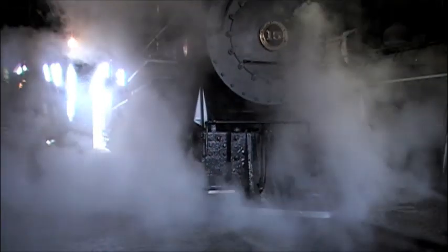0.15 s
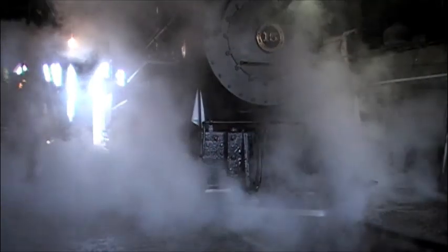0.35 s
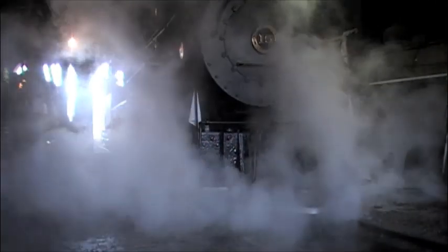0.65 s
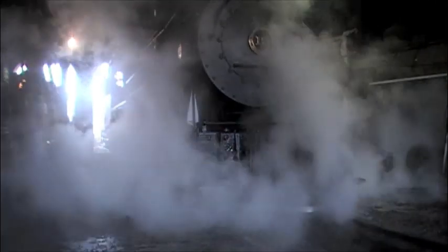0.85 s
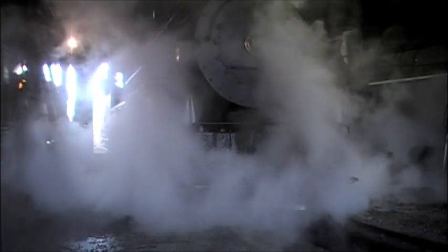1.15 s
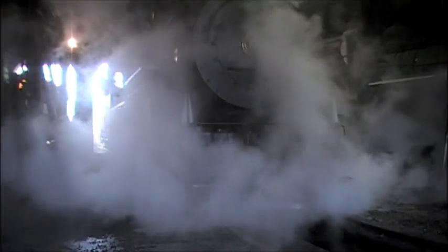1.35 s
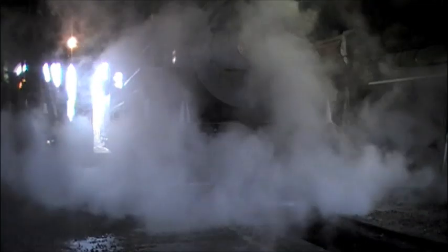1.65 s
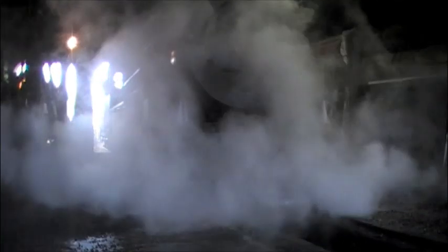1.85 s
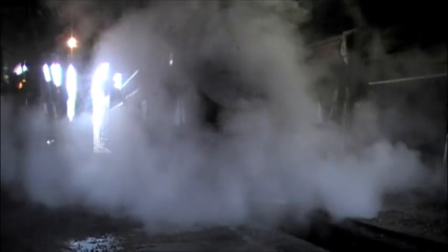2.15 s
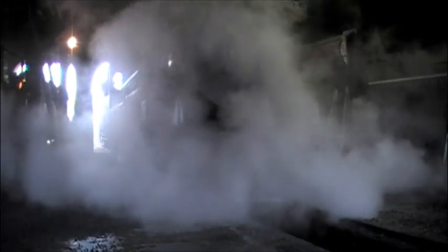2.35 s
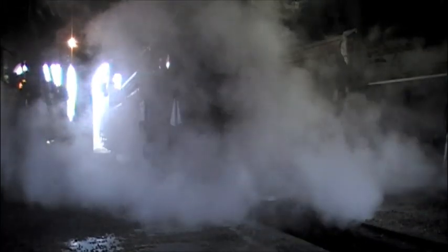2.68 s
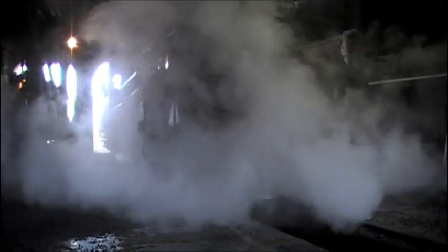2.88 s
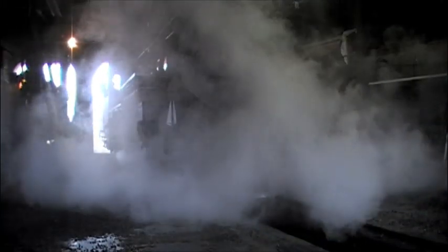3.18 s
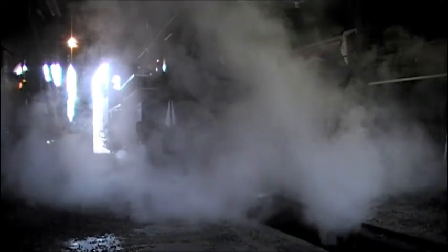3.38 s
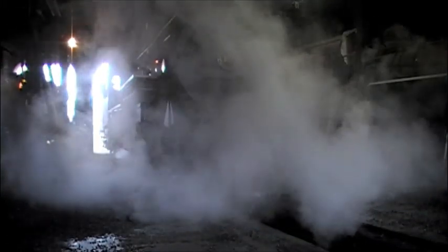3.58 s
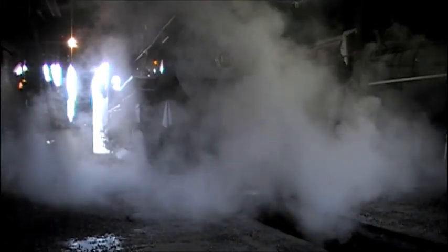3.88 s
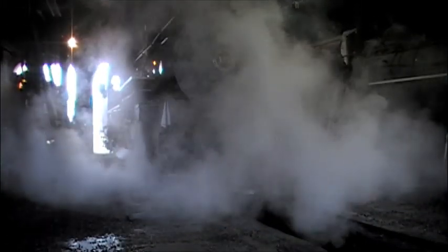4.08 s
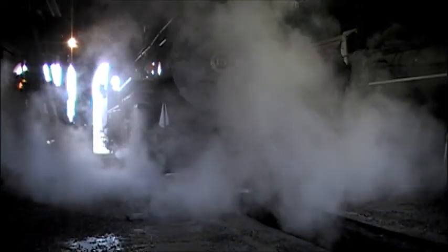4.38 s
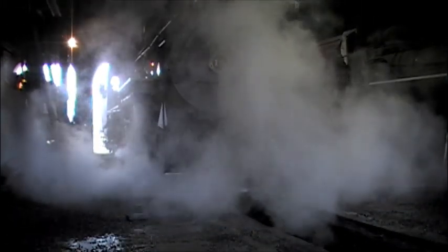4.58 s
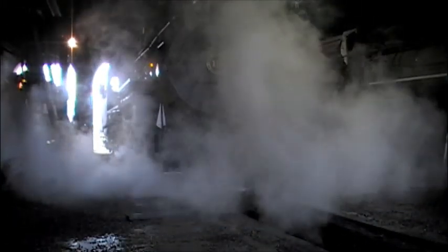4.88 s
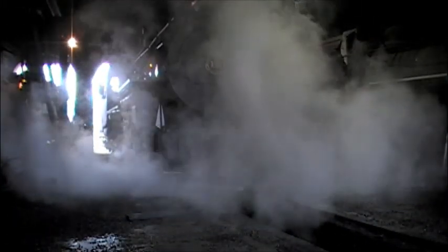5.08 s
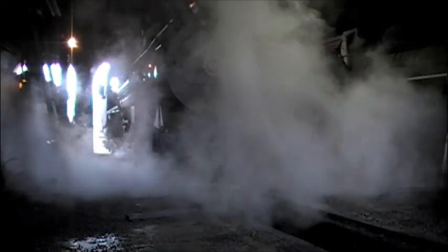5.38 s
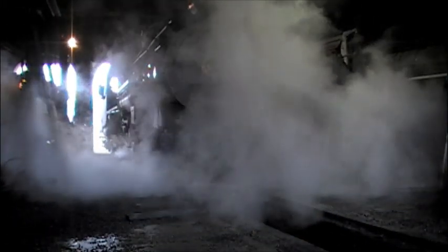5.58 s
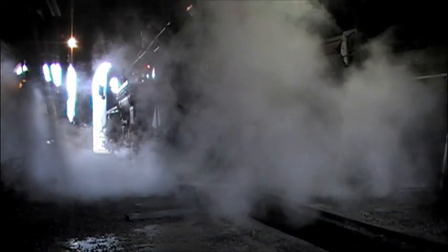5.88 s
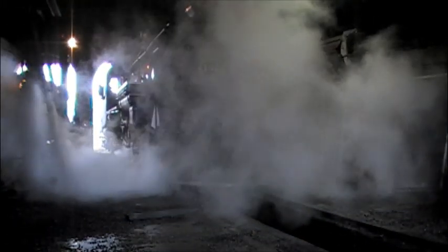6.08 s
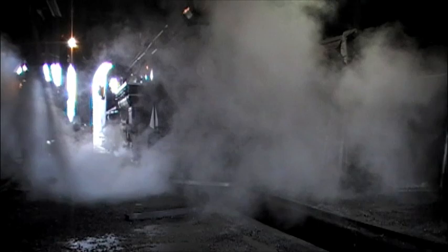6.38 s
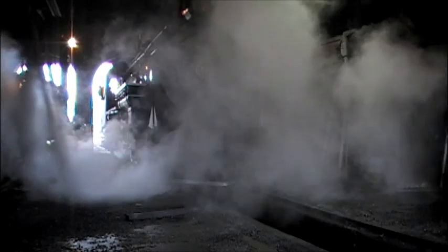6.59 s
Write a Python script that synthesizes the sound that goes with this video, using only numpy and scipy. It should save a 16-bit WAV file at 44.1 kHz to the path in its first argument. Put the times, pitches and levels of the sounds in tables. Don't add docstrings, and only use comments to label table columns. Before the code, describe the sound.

Inside a large brick engine shed, a steam locomotive blows off close to a stereo pair of microphones. Roaring exhaust and sharp hiss start loud, the hiss jumps brighter with a brief high squeal, then a wavering breathy screech slides steadily down. A valve thuds shut midway; the jet weakens, leaving low boiler rumble and faint pipe hoots. At the very end a rod squeaks in quick metallic chirps.

```python
import sys
import numpy as np
from scipy import signal
from scipy.fft import rfft, irfft, next_fast_len
from scipy.io import wavfile
from scipy.ndimage import uniform_filter1d, map_coordinates

SR = 44100
rng = np.random.default_rng(int(sys.argv[2]) if len(sys.argv) > 2 else 0)


def store_wav(level_fs):
    pcm = np.round(np.clip(np.atleast_2d(level_fs), -1, 1) * 32767)
    wavfile.write(sys.argv[1], SR, pcm.T.astype(np.int16))


def linear_from_db(decibels):
    return 10 ** (np.asarray(decibels, float) / 20)


N = 297221
TIME = np.arange(N) / SR

# frequency in Hz, likeness from 0 to 1.
STEREO_LIKENESS = [(60, 0.94), (300, 0.94), (1400, 0.9), (3000, 0.86), (5000, 0.84), (7000, 0.94),
                   (9500, 0.32), (14500, 0.25)]
# frequency in Hz, t60 in seconds.
SHED_DECAY = [(200, 1.6), (2000, 0.53), (10000, 0.31)]

# time in seconds, level in dB.
EXHAUST_FLOW = [(0, -25.5), (.06, -23.5), (.22, -24.5), (.38, -25), (.47, -32), (.54, -33), (1.3, -36),
                (1.95, -34), (2.2, -31.5), (3, -31), (3.38, -29), (3.5, -33), (3.62, -30), (4.4, -33),
                (5.1, -34.5), (5.86, -34), (5.98, -32.5), (6.74, -33.5)]
# frequency in Hz, level in dB per Hz.
RUMBLE_SPECTRUM = [(13, -51), (22, -16), (65, -8.5), (81, -4.5), (108, -8.5), (140, -8), (180, -32),
                   (310, -120)]
BOOM_SPECTRUM = [(79, -69), (135, -15.5), (253, -0.5), (404, 0), (470, 2), (610, -63), (1030, -120)]
LOW_ROAR_SPECTRUM = [(270, -39), (460, -8.5), (591, -3.5), (980, -3.5), (1270, -22), (2160, -120)]
UPPER_ROAR_SPECTRUM = [(590, -45), (1000, -2), (1800, -1.5), (2300, -2), (2450, -3.5), (3180, -8),
                       (5390, -120)]
# (middle in seconds, length in seconds, level in dB).
BLOWN_PIPES = [ (602, 40, -18, -10, [(5.5, 1.6, -43), (6.66, .2, -38)]),
               (684, 30, -11, -13.5, [(5.4, .6, -43)]), (1496, 70, -14, -15, [(3.46, .08, -27),
               (3.64, .08, -30), (6.14, .25, -34), (6.55, .2, -40)]),
               (1373, 60, -10.5, -9, [(6.22, .16, -38)]), (2303, 110, -22, -23, [(5.07, 0.56, -41),
               (6.1, 0.18, -40)]), (3654, 120, -24, -10.5, [(3.9, .5, -43)]),
               (389.5, 72, -25, -20, [(6.25, 0.35, -41.5)]), (76, 6, -45, -37, [(4.3, 1.2, -69)]),
               (167, 8.4, -49, -35, [(4.3, 0.82, -59)])]

# start in seconds, frame ring in dB, steam puff in dB.
VALVE_JOLTS = [
    (3.566, -35.5, -28),
    (3.622, -38, -28.5),
    (3.685, -43, -32),
]
# frequency in Hz, level in dB per Hz.
PUFF_SPECTRUM = [(60, -26), (150, -7), (300, -4), (480, -7), (900, -40)]
# pitch in Hz, t60 in seconds.
FRAME_RING = (76, .13)
# start in seconds, length in seconds, peak in dB, pitch in Hz, click in dB.
ROD_SQUEAKS = [
    (6.606, 0.0068, -21.5, 5150, -1),
    (6.621, 0.005, -25, 5100, 1),
    (6.631, .012, -31.5, 4950, -20),
    (6.642, 0.0106, -33, 4920, -12),
    (6.7, 0.0094, -21, 5110, -12),
    (6.709, 0.013, -32, 5130, -25),
    (6.722, .022, -29, 5186, -25),
]

# time in seconds, pitch in Hz, breathy band in dB.
TONE_GLIDE = [(0, 5270, -31), (.37, 5260, -29), (.41, 6120, -26), (.49, 7500, -28), (.59, 7450, -30),
              (.62, 6280, -30), (1.5, 5270, -24), (2.4, 4400, -26.5), (3.36, 3080, -30)]
# middle in seconds, length in seconds, pitch in Hz, level in dB.
PITCH_LOCKS = [ (.13, 0.051, 5050, -26), (.27, .06, 5220, -28), (.34, .03, 5200, -33),
               (.385, .02, 5100, -30), (0.411, 0.036, 6190, -21), (.455, .03, 6900, -27),
               (.56, 0.083, 7430, -25), (.99, .05, 5840, -29), (1.1, 0.09, 5600, -27),
               (1.23, .1, 5600, -22), (1.32, .05, 5300, -26), (1.46, .05, 5280, -25),
               (1.65, 0.096, 5330, -28), (1.83, .06, 5085, -22), (1.91, .03, 4940, -33),
               (2.11, .09, 4780, -27), (2.29, .1, 4600, -24), (2.45, 0.068, 4460, -25),
               (2.57, 0.083, 4110, -30), (2.69, .07, 4110, -33), (2.77, .06, 3964, -33),
               (2.86, 0.054, 3720, -26), (2.99, 0.067, 3760, -31), (3.09, .08, 3480, -23),
               (3.25, 0.053, 3280, -23), (3.318, 0.027, 3060, -19)]
# middle in seconds, length in seconds, pitch as a multiple of the tone,
# width in Hz, level in dB.
COCK_FLARE = (.5, .17, 1.03, 1300, -19)
# time in seconds, rush in dB, fizz over rush in dB, left minus right in dB.
JET_MOVES = [(0, -22.5, -7, -.5), (.2, -20.5, -4, -.3), (.37, -19.5, -2, -1), (.46, -23.5, 6.5, -3.5),
             (.55, -23, 3.5, -2.5), (.75, -24, 5, -1.8), (.88, -23.5, 4.5, -2.2), (1.4, -25, 4.5, -3),
             (1.8, -22, 2, -2), (2.08, -24, 3.5, -2.5), (2.5, -21.5, 1.5, -1.8), (3.1, -20.5, -0.5, -1.2),
             (3.5, -21.5, -2, 0), (3.75, -24, -1, .7), (4.67, -28, 0, -1), (5.37, -34, 0.7, -1),
             (5.72, -33, 1.5, -1), (6.74, -34, -2, -.7)]
# frequency in Hz, level in dB per Hz.
RUSH_SPECTRUM = [(1500, -57), (2550, -8.5), (3320, -1.5), (3580, -0.5), (4030, -1), (4740, 1), (6300, -4),
                 (8190, -8), (13900, -120)]
FIZZ_SPECTRUM = [(3760, -36), (6400, -4), (8500, 4.5), (9630, 4), (11600, -6), (13300, -15), (13900, -14.5),
                 (15000, -23)]

# frequency in Hz, left minus right in dB.
MIC_BALANCE = [(25, -3.5), (60, -3.5), (200, -4.5), (400, -3.5), (700, -2), (1300, -.7), (2500, -1.5)]
# frequency in Hz, lead of the left in radians.
MIC_PHASE = [(400, 0.13), (780, 0.38), (1550, -0.12), (4650, 0.44), (6300, -0.68), (9400, -0.78),
             (10500, -0.42), (13000, -0.13)]


def unit(x):
    return x / np.sqrt(np.mean(np.abs(x) ** 2) + 1e-20)


def along(points, hz):
    f, v = np.transpose(points)
    return np.interp(np.log(hz + 1), np.log(f + 1), v)


def curves(rows):
    s, *cols = np.transpose(rows)
    return [np.interp(TIME, s, c) for c in cols]


def wobble(rate):
    coarse = TIME[::64]
    knots = rng.standard_normal(int(N * rate / SR) + 4)
    return np.interp(TIME, coarse, map_coordinates(knots, [coarse * rate]))


def swell(s, length):
    return 1 / (1 + (2 * (TIME - s) / length) ** 4)


def filtered(x, response):
    m = next_fast_len(N + SR // 2)
    return irfft(rfft(x, m) * response(np.fft.rfftfreq(m, 1 / SR)), m)[..., :N]


def spaced(pair):
    def mid_side(hz):
        turn = np.arccos(np.clip(along(STEREO_LIKENESS, hz), -1, 1)) / 2
        return np.array([np.cos(turn), np.sin(turn)])

    mid, side = filtered(pair, mid_side)
    return np.array([mid + side, mid - side])


def turbulence(spectrum, patchy_db):
    z = signal.stft(rng.standard_normal((2, N)), nperseg=512)[2]
    eddies = uniform_filter1d(rng.standard_normal(z.shape[1:]), size=8, axis=0)
    eddies = unit(uniform_filter1d(eddies, size=12, axis=1))
    pair = signal.istft(z * linear_from_db(patchy_db * eddies), nperseg=512)[1][:, :N]
    return unit(filtered(pair, lambda hz: linear_from_db(along(spectrum, hz))))


def fuzzy_tone(pitch_hz, width_hz):
    keep = np.exp(-np.pi * width_hz / SR)
    slow = signal.lfilter([1], [1, -2 * keep, keep ** 2], rng.standard_normal((4, N)))
    phase = 2 * np.pi * np.cumsum(pitch_hz * np.ones(N)) / SR
    return unit(slow[:2] * np.cos(phase) + slow[2:] * np.sin(phase))


def shed(x):
    _, t, z = signal.stft(rng.standard_normal((2, SR)), SR, nperseg=256)
    hz = np.fft.rfftfreq(256, 1 / SR)
    tail = signal.istft(z * linear_from_db(-60 * t / along(SHED_DECAY, hz)[:, None]), SR, nperseg=256)[1]
    late = np.pad(x, (600, 0))[None]
    return signal.fftconvolve(late, tail / np.linalg.norm(tail[0]), axes=1)[:, :N]


def exhaust():
    flow_db, = curves(EXHAUST_FLOW)
    shut = np.clip((TIME - 3.52) / .06, 0, 1)
    rumble_db = flow_db - 36 + 7.5 * shut + 2.5 * wobble(4.8)
    roar = linear_from_db(rumble_db) * turbulence(RUMBLE_SPECTRUM, patchy_db=-2.8)
    roar += linear_from_db(flow_db - 9.5 + 1.1 * wobble(9)) * turbulence(BOOM_SPECTRUM, patchy_db=0.55)
    roar += linear_from_db(flow_db + 0.77 * wobble(8)) * turbulence(LOW_ROAR_SPECTRUM, patchy_db=0.64)

    wash_db = curves(JET_MOVES)[0] - 4.5 - 1.2 * shut
    upper = np.hypot(linear_from_db(flow_db + 2), linear_from_db(wash_db))
    roar += upper * linear_from_db(.6 * wobble(9)) * turbulence(UPPER_ROAR_SPECTRUM, patchy_db=0.55)

    for hz, width_hz, open_db, shut_db, hoots in BLOWN_PIPES:
        blown = linear_from_db(flow_db + open_db + (shut_db - open_db) * shut)
        for s, length, db in hoots:
            blown = blown + linear_from_db(db) * swell(s, length)
        roar += blown * linear_from_db(.9 * wobble(8)) * fuzzy_tone(hz, width_hz)
    return spaced(roar)


def valve():
    ring_hz, ring_t60 = FRAME_RING
    puff = unit(filtered(rng.standard_normal(N), lambda hz: linear_from_db(along(PUFF_SPECTRUM, hz))))
    out = np.zeros(N)
    for s, ring_db, puff_db in VALVE_JOLTS:
        t = np.clip(TIME - s, 0, None)
        jolt = (1 - np.exp(-t / 0.0032)) * linear_from_db(-60 * t / ring_t60)
        ring = np.sin(2 * np.pi * ring_hz * t)
        out += jolt * (linear_from_db(ring_db) * ring + linear_from_db(puff_db) * puff)
    return out


def squeaks():
    lower_hz, knock_hz, click_t60 = 4100, 1670, 0.03
    out = np.zeros(N + SR)
    t = np.arange(SR // 10) / SR
    for s, length, db, hz, click_db in ROD_SQUEAKS:
        grip = (1 - np.exp(-t / (.15 * length))) / (1 + (t / length) ** 5)
        lower_db = -5 if s < 6.67 else -15.5
        modes = np.sin(2 * np.pi * hz * t) + linear_from_db(lower_db) * np.sin(2 * np.pi * lower_hz * t)
        scrape = 4 * np.gradient(uniform_filter1d(rng.standard_normal(len(t)), size=6))
        knock = np.sin(2 * np.pi * knock_hz * t)
        click = linear_from_db(click_db - 60 * t / click_t60) * (scrape + knock)
        out[round(s * SR):][:len(t)] += linear_from_db(db) * (grip * modes + click)
    return out[:N]


def screech():
    glide_hz, band_db = curves(TONE_GLIDE)
    middle, _, lock_hz, _ = np.transpose(PITCH_LOCKS)
    nearest = np.searchsorted((middle[1:] + middle[:-1]) / 2, TIME)
    held_hz = lock_hz[nearest] + 45 * wobble(30)

    line = linear_from_db(-38.5)
    for s, length, _, db in PITCH_LOCKS:
        line = line + linear_from_db(db) * swell(s, length)

    sinking = TIME > .95
    band_hz = glide_hz + .5 * (held_hz - glide_hz) * sinking
    band = linear_from_db(band_db + 1.2 * wobble(18)) * fuzzy_tone(band_hz, width_hz=620)

    s, length, above, width_hz, db = COCK_FLARE
    early = linear_from_db(-29) * (TIME < TONE_GLIDE[1][0])
    band += (linear_from_db(db) * swell(s, length) + early) * fuzzy_tone(above * glide_hz, width_hz)

    sounding = uniform_filter1d(1. * (TIME < TONE_GLIDE[-1][0]), size=800)
    tone = sounding * (band + line * fuzzy_tone(held_hz, width_hz=70))
    return linear_from_db(-3) * tone + linear_from_db(-10) * shed(tone[0])


def jet():
    rush_db, sharp_db, pan_db = curves(JET_MOVES)
    surge = 0.25 * wobble(9) + 0.65 * wobble(28)
    rush_gain = linear_from_db(rush_db + 0.56 + surge + 0.13 * wobble(8))
    fizz_gain = linear_from_db(rush_db + sharp_db + 1.92 + surge + 0.43 * wobble(6.4))
    hiss = rush_gain * turbulence(RUSH_SPECTRUM, patchy_db=0.9)
    hiss += fizz_gain * turbulence(FIZZ_SPECTRUM, patchy_db=1.1)
    return spaced(hiss + screech()) * linear_from_db(np.outer([.5, -.5], pan_db))


def scene():
    iron = valve() + squeaks()
    iron_pair = iron * linear_from_db([[-.3], [.3]])
    return exhaust() + iron_pair + linear_from_db(-12) * shed(iron) + jet()


def top_cut(x):
    return signal.sosfilt(signal.butter(12, 15110, fs=SR, output="sos"), x)


def record(dry):
    def pair_response(hz):
        bass_cut = hz ** 2 / (hz ** 2 + 40 ** 2)
        balance = linear_from_db(along(MIC_BALANCE, hz) * (hz < 2500) / 2)
        left = balance * np.exp(.5j * along(MIC_PHASE, hz))
        return bass_cut * np.array([left, 1 / left])

    heard = filtered(dry, pair_response)
    heard = heard / (1 + np.abs(heard / .9) ** 6) ** (1 / 6)
    return top_cut(heard)


dry = scene()
out = record(dry)
store_wav(out)
```